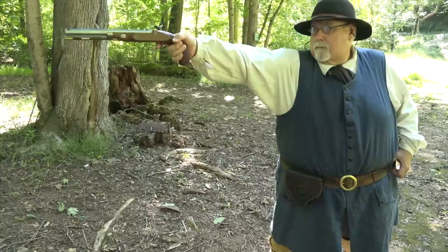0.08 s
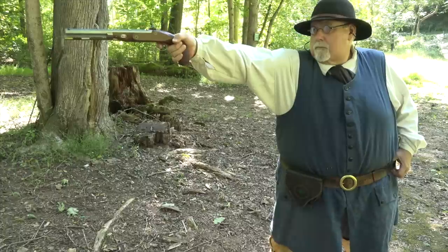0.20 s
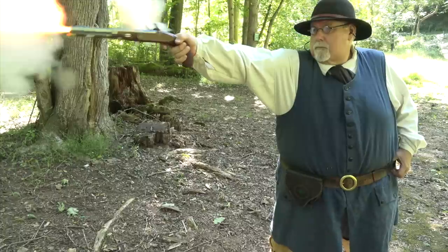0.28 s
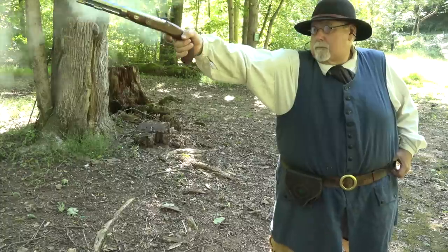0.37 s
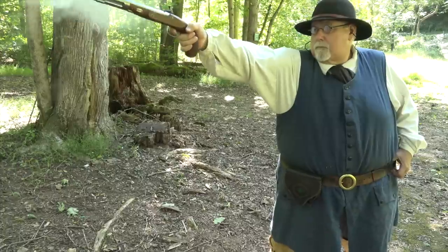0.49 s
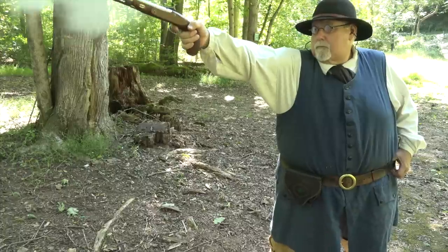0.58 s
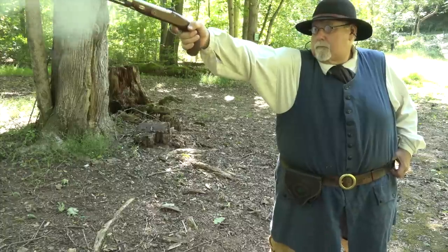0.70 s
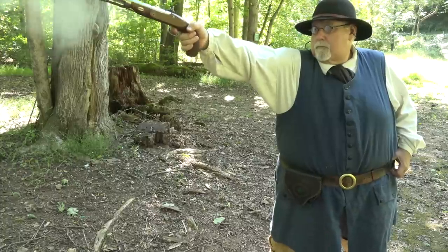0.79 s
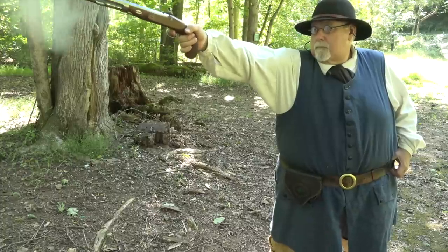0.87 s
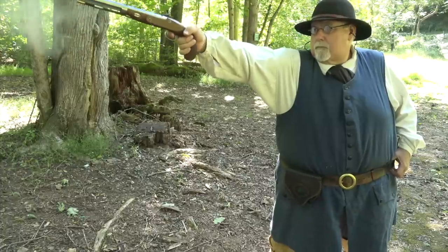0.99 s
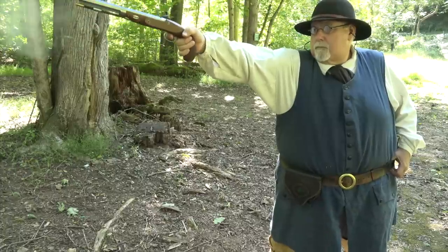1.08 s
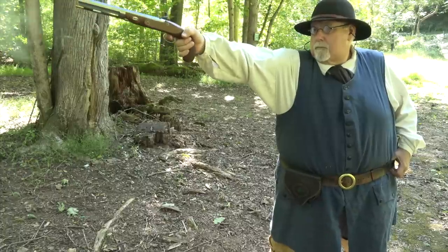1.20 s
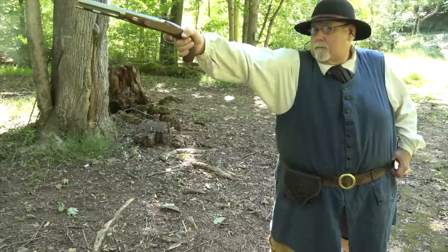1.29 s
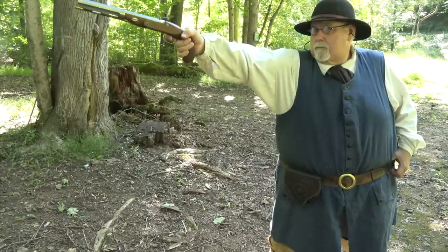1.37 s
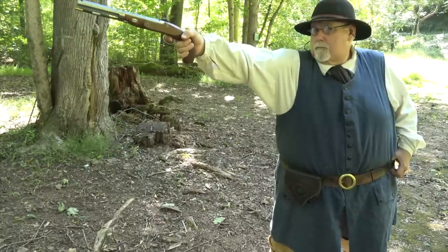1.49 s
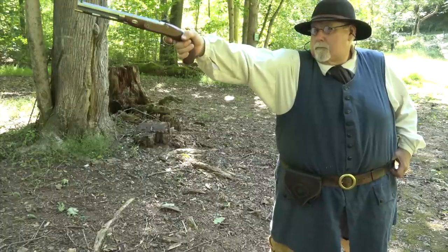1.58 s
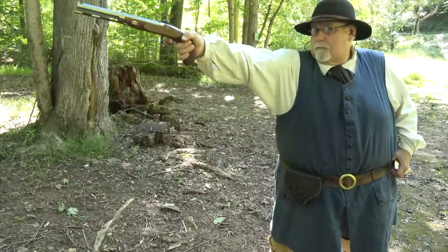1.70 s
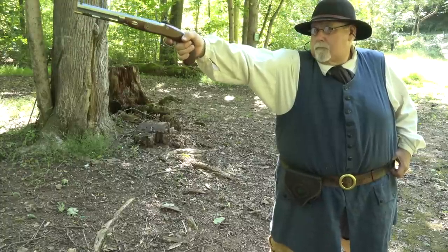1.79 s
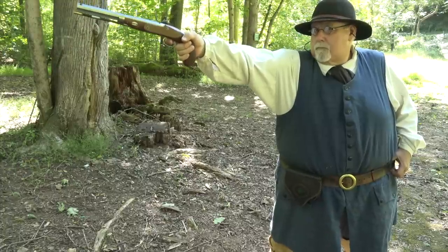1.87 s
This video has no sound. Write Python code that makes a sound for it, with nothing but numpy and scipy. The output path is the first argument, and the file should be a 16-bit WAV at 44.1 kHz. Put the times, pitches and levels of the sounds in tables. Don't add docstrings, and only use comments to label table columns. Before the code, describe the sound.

A flintlock pistol shot cracks out in a wood, its echo rolling away through the trees.

```python
import sys
import numpy as np
from scipy import signal
from scipy.fft import rfft, irfft
from scipy.io import wavfile
from scipy.ndimage import uniform_filter1d

SR = 44100
rng = np.random.default_rng(int(sys.argv[2]) if len(sys.argv) > 2 else 0)


def convert_level_to_amplitude(level_db):
    exponent = np.asarray(level_db, float) / 20
    return 10 ** exponent


def transcribe(u):
    v = np.clip(np.atleast_2d(u).T, -1, 1)
    q = np.round(v * 32767).astype(np.int16)
    wavfile.write(sys.argv[1], SR, q)


N = 83790
T = np.arange(N) / SR

WHISTLE_S, HEAVE_S = .3167, .3209
GUN_PAN_DB = 3.5
# (frequency [Hz], level difference [dB])
FAR_PAN = [(60, 6), (200, -2), (400, -5), (1300, -1.5), (2400, 1), (4400, 2), (15000, -2)]


def read(table, at, log=False):
    a = np.array(table, float)
    if log:
        return np.interp(np.log(at), np.log(a[:, 0]), a[:, 1])
    return np.interp(at, a[:, 0], a[:, 1])


def unit(x):
    return x / np.sqrt(np.mean(x ** 2))


def coloured(colour):
    hz = np.maximum(np.fft.rfftfreq(N, 1 / SR), 1)
    return unit(irfft(rfft(rng.standard_normal(N)) * convert_level_to_amplitude(read(colour, hz, True)), N))


def walk(rate_hz):
    k = int(SR / rate_hz)
    steps = np.repeat(rng.standard_normal(N // k + 1), k)
    return unit(uniform_filter1d(uniform_filter1d(steps, k), k)[:N])


def band_noise(lo_hz, hi_hz):
    sos = signal.butter(2, [lo_hz, min(hi_hz, .45 * SR)], "band", fs=SR, output="sos")
    return unit(signal.sosfilt(sos, rng.standard_normal(N)))


def pan(db):
    return convert_level_to_amplitude(np.array([db / 2, -db / 2])).reshape(2, -1)


def decay(at_s, t60_s):
    return 1000. ** (-np.maximum(T - at_s, 0) / t60_s)


def ring(at_s, hz, t60_s):
    return np.sin(2 * np.pi * hz * np.maximum(T - at_s, 0)) * decay(at_s, t60_s)


def spread(colour, shape):
    # (frequency [Hz], level [dB])
    side_width = [(60, -21), (300, -21.5), (700, -17.5), (1400, -31.5), (6000, -28), (7200, 2),
                  (10500, -3.5), (13000, -14)]
    hz_all = np.maximum(np.fft.rfftfreq(N, 1 / SR), 1)
    mid, side = rfft(coloured(colour)), rfft(coloured(colour))
    out = 0
    for hz in 25 * 2 ** (np.arange(29) / 3):
        mask = np.cos(np.pi / 2 * np.clip(3 * np.log2(hz_all / hz), -1, 1)) ** 2
        gain, pan_db = shape(hz)
        m = irfft(mid * mask, N)
        s = irfft(side * mask, N) * convert_level_to_amplitude(read(side_width, hz, True))
        out = out + gain * pan(pan_db) * np.array([m + s, m - s])
    return out


def note(at_s, long_s, end_hz, peak_hz, db):
    arch = np.sin(np.pi * np.clip((T - at_s) / long_s, 0, 1))
    hz = end_hz + (peak_hz - end_hz) * arch
    return convert_level_to_amplitude(db) * arch * np.sin(2 * np.pi * np.cumsum(hz) / SR)


def birds():
    # (first note [s], period [s], length [s], end frequency [Hz], peak frequency [Hz], level [dB])
    song = [
        (-.004, .2008, .055, 7380, 7720, -54),
        (.035, .2255, .065, 6920, 7060, -51),
    ]
    # (time [s], length [s], peak frequency [Hz], level [dB])
    stray = [
        (.1, .03, 7100, -54),
        (1.68, .045, 4030, -49),
    ]
    slips = rng.standard_normal((10, len(song), 2))
    out = sum(note(s, long_s, 0.8 * hz, hz, db) for s, long_s, hz, db in stray)
    for k in range(10):
        for (s, period_s, long_s, end_hz, peak_hz, db), (dt, dl) in zip(song, slips[k]):
            out = out + note(s + k * period_s + .003 * dt, long_s, end_hz, peak_hz, db + 1.5 * dl)
    leaves = rng.standard_normal((2, 3000)) * np.exp(-np.arange(3000) / 800.) * .035
    leaves[:, 0] = 1
    leaves[1] = np.roll(leaves[1], 2)
    return signal.fftconvolve(out[None], leaves)[:, :N]


def wood():
    # (frequency [Hz], level [dB per Hz])
    hiss_colour = [(18, -38), (30, -1.5), (56, 5.5), (103, -6), (702, -9), (4080, -6), (7270, -13.5),
                   (8740, -25), (16000, -27)]
    hiss_db, insect_hz, insect_db = -44.5, 3880, -68.5
    swell = walk(2.6)

    def shape(hz):
        return convert_level_to_amplitude(hiss_db + 0.21 * swell + 0.86 * walk(31)), read(FAR_PAN, hz, True)

    hiss = spread(hiss_colour, shape)
    insects = band_noise(.96 * insect_hz, 1.04 * insect_hz) * convert_level_to_amplitude(insect_db + 3.3 * walk(20))
    return hiss + insects * pan(2.0) + birds()


def trees():
    # (time [s], level [dB])
    roll = [(.319, -38), (.324, -11), (.36, -17.5), (.46, -15), (.62, -12), (.83, -16.5), (1.1, -22),
            (1.5, -27), (1.9, -32)]
    # (frequency [Hz], level [dB per Hz])
    roll_colour = [(18, -53), (30, -23), (130, -5.5), (330, -6.5), (1200, -8.5), (2000, -5), (4800, -6.5),
                   (8500, -20.5), (15500, -31.5)]
    # (frequency [Hz], loss [dB per s])
    air_loss = [(40, -3), (130, 6), (400, -1), (1000, 2), (2500, 17.5), (5000, 39.5), (8000, 66.5),
                (14000, 129)]
    # (frequency [Hz], flicker [dB])
    flicker = [(60, 2), (300, 2), (1500, .8), (10000, .6)]
    # (frequency [Hz], level difference [dB])
    near_pan = [(60, 1.5), (400, 0.5), (700, 3.5), (4400, 3), (8000, 1), (15000, -3)]
    far_from_s, far_by_s = 0.64, 0.93
    boom_hz, boom_db, boom_ends_s, boom_fade_db_per_s = 128, -31, .83, 120
    build_above_hz = 900
    shared = walk(25.03)
    far = np.clip((T - far_from_s) / (far_by_s - far_from_s), 0, 1)
    age = np.maximum(T - .36, 0) ** 1.1
    build_db = -9 * np.exp(-np.maximum(T - HEAVE_S, 0) / .016)

    def shape(hz):
        db = read(roll, T) - read(air_loss, hz, True) * age
        db = db + read(flicker, hz, True) * walk(14.06) + 0.7 * shared
        db = db + build_db / (1 + (build_above_hz / hz) ** 2)
        pan_db = read(near_pan, hz, True) * (1 - far) + read(FAR_PAN, hz, True) * far
        return convert_level_to_amplitude(db) * (T > roll[0][0]), pan_db

    boom = band_noise(.84 * boom_hz, 1.18 * boom_hz)
    boom = boom / np.sqrt(np.abs(signal.hilbert(boom)) + .2)
    boom = unit(boom) * (T > HEAVE_S)
    boom = boom * convert_level_to_amplitude(boom_db - boom_fade_db_per_s * np.maximum(T - boom_ends_s, 0))
    return spread(roll_colour, shape) + boom * pan(GUN_PAN_DB)


def flint():
    # (time [s], peak level [dB], ring frequency [Hz])
    contacts = [(.2222, -8, 5500), (.2277, -14, 8500), (.2297, -10, 7000), (.2325, -10, 6500),
                (.2352, -11, 3800), (.2385, -12, 5200), (.2411, -13, 7000), (.2438, -10, 4200),
                (.2479, -9, 4500), (.2503, -12, 3600), (.2527, -10, 4800), (.2566, -8.5, 4800)]
    # (frequency [Hz], level [dB per Hz])
    rasp_colour = [(180, -53), (300, -23), (440, -37), (946, -4.5), (2480, -9), (3950, -1), (14000, -17.5),
                   (16000, -26)]
    rasp_from_s, rasp_to_s, rasp_db = .2221, .26, -26
    contact_t60_s, crack_db = .006, -14
    strike_db, strike_t60_s = -22, 0.015
    noise = coloured(rasp_colour)
    gate = uniform_filter1d(1. * ((T > rasp_from_s + .004) & (T < rasp_to_s)), size=120)
    out = noise * convert_level_to_amplitude(rasp_db) * gate * convert_level_to_amplitude(2 * walk(400))
    for s, db, hz in contacts:
        crack = convert_level_to_amplitude(crack_db) * (T >= s) * decay(s, contact_t60_s) * noise
        out = out + convert_level_to_amplitude(db) * (ring(s, hz, contact_t60_s) + crack)
    strike = (T >= rasp_from_s) * decay(rasp_from_s, strike_t60_s)
    return out + convert_level_to_amplitude(strike_db) * strike * band_noise(3000, 17000)


def priming():
    # (time [s], level [dB])
    flare = [(.256, -45), (.261, -27), (.285, -29), (.303, -31), (.31, -28), (.314, -33), (.32, -33)]
    # (frequency [Hz], level [dB per Hz])
    flare_colour = [(400, -33), (700, -20), (1100, -4), (1400, -6), (5300, -2), (8000, -13.5), (15000, -20),
                    (16000, -34)]
    puff_s, puff_hz, puff_db, puff_rise_s = 0.2696, 159, -26.5, 0.013
    burning = (T > flare[0][0]) * (T < flare[-1][0])
    hiss = coloured(flare_colour) * convert_level_to_amplitude(read(flare, T)) * burning
    u = np.maximum(T - puff_s, 0) / puff_rise_s
    puff = band_noise(0.17 * puff_hz, 2.3 * puff_hz) * (u * np.exp(1 - u)) ** 1.2 * convert_level_to_amplitude(puff_db)
    return hiss + puff


def vent():
    # (time [s], relative level [dB])
    jet_level = [(.3045, -20), (.307, -4), (.3105, 0), (.3135, -7), (.3155, 2), (.3185, 4), (.3205, -20)]
    jet_db, jet_hz = -23.5, 6600
    whistle_hz, whistle_db, whistle_wide_s = 8200, -10, .00042
    u = T - WHISTLE_S
    whistle = np.sin(2 * np.pi * whistle_hz * u) * np.exp(-(u / whistle_wide_s) ** 2 / 2)
    blowing = (T > jet_level[0][0]) * (T < jet_level[-1][0])
    jet = band_noise(.45 * jet_hz, 2.1 * jet_hz) * convert_level_to_amplitude(jet_db + read(jet_level, T)) * blowing
    return convert_level_to_amplitude(whistle_db) * whistle + jet


def muzzle():
    # (time [s], peak level [dB], ring frequency [Hz])
    slaps = [
        (.3228, -7, 890),
        (.3241, 7, 1650),
        (.3281, -27, 2500),
        (.3367, -10, 1780),
    ]
    crack_s, crack_long_s, crack_db, crack_hz = .3174, .0036, -15, 2200
    heave_hz, heave_db, heave_t60_s = 150, -8, .07
    sub_s, sub_hz, sub_db, sub_t60_s = .326, 72.3, -21.5, 0.22
    rumble_db, rumble_hz, rumble_t60_s = -19.5, 290, 0.33
    gate = uniform_filter1d(1. * ((T > crack_s) & (T < crack_s + crack_long_s)), size=30)
    out = convert_level_to_amplitude(crack_db) * gate * band_noise(0.18 * crack_hz, 2.9 * crack_hz)
    out += convert_level_to_amplitude(heave_db) * ring(HEAVE_S, heave_hz, heave_t60_s)
    out += convert_level_to_amplitude(sub_db) * ring(sub_s, sub_hz, sub_t60_s)
    rise = np.minimum(np.maximum(T - HEAVE_S, 0) / .004, 1)
    rumble = band_noise(.45 * rumble_hz, 2.4 * rumble_hz) * rise * decay(HEAVE_S, rumble_t60_s)
    out += convert_level_to_amplitude(rumble_db) * rumble
    for s, db, hz in slaps:
        out -= convert_level_to_amplitude(db) * ring(s, hz, 0.0045)
    return out


def scene():
    duck_db, quick_db, quick_s, return_db_per_s = -13, -20, .12, 4.8
    u = np.maximum(T - WHISTLE_S, 0)
    gain_db = duck_db + return_db_per_s * (u - .5) + quick_db * np.exp(-u / quick_s)
    gain_db = (T > WHISTLE_S) * np.minimum(gain_db, 0)
    pistol = flint() + priming() + vent() + muzzle()
    return wood() * convert_level_to_amplitude(gain_db) + trees() + pistol * pan(GUN_PAN_DB)


def low_pass(x, hz):
    return signal.sosfiltfilt(signal.ellip(6, .1, 50, hz, fs=SR, output="sos"), x)


def roll_off(x):
    return signal.sosfilt(signal.butter(12, 16730, fs=SR, output="sos"), x)


def record(dry):
    ceiling_db, ceiling_dip_db, ceiling_back_s = 9, -19, .06
    bass_cut_hz, top_hz, mono_above_hz = 58, 15700, 11600
    u = T - HEAVE_S
    dip_db = ceiling_dip_db * (u > 0) * np.exp(-np.maximum(u, 0) / ceiling_back_s)
    ceiling = convert_level_to_amplitude(ceiling_db + dip_db) * pan(GUN_PAN_DB)
    capsule = ceiling * np.tanh(dry / ceiling)
    x = signal.sosfilt(signal.butter(1, bass_cut_hz, "high", fs=SR, output="sos"), capsule)
    mid = low_pass((x[0] + x[1]) / 2, top_hz)
    side = low_pass((x[0] - x[1]) / 2, mono_above_hz)
    return roll_off(np.array([mid + side, mid - side]))


dry = scene()
out = record(dry)
transcribe(out)
```